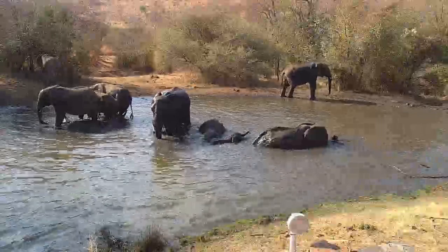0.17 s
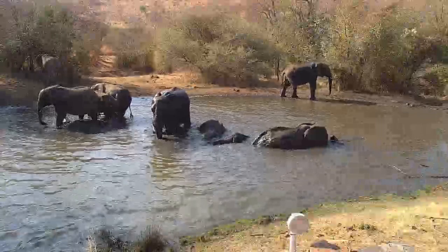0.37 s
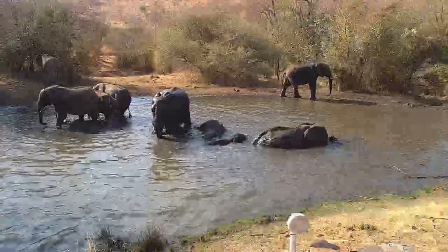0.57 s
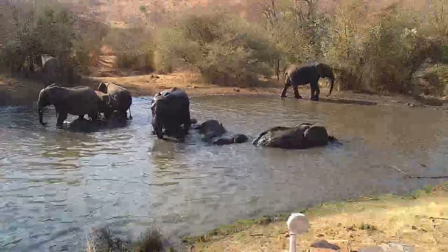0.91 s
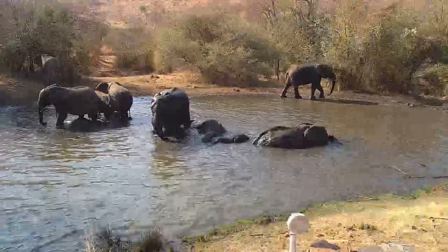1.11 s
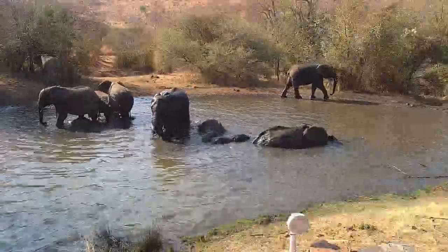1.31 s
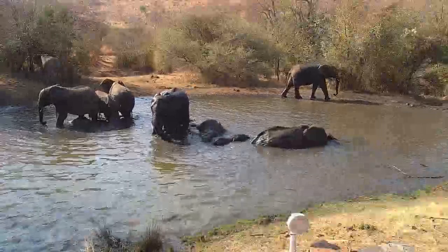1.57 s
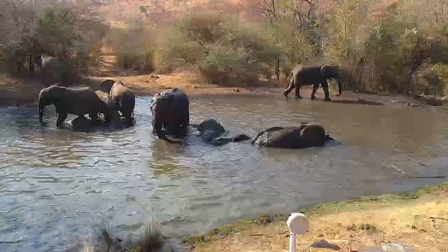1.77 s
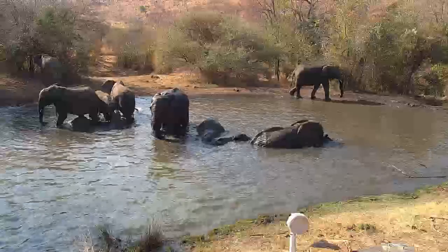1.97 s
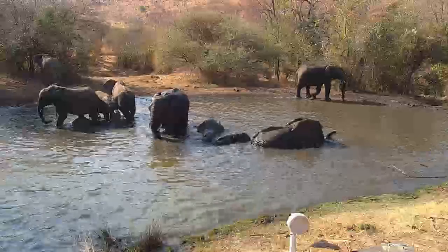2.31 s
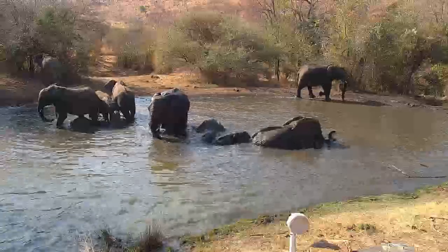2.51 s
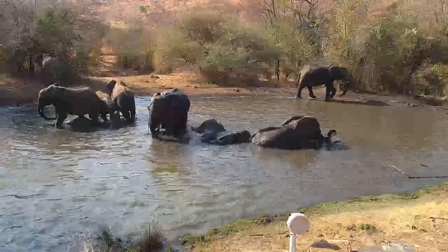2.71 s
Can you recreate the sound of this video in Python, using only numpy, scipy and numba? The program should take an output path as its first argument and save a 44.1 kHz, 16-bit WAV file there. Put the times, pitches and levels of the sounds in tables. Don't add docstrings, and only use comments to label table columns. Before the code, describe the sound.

Elephants wallow in a shallow waterhole: water churns and fizzes, hollow gulps and drops follow, splashes crowd together near one second, then one loud gulping splash; outdoors, heard through a boomy, boxed-in microphone with faint buzz.

```python
import sys
import numpy as np
from scipy import signal
from scipy.fft import rfft, irfft
from scipy.io import wavfile
from scipy.ndimage import uniform_filter1d
from numba import njit

SR = 44100
rng = np.random.default_rng(int(sys.argv[2]) if len(sys.argv) > 2 else 0)


def level_to_linear(level):
    exponent = np.asarray(level, float) / 20
    return 10 ** exponent


def inscribe(sig):
    pcm = np.round(np.clip(np.atleast_2d(sig).T, -1, 1) * 32767)
    wavfile.write(sys.argv[1], SR, pcm.astype(np.int16))


N = 127890

# t/s, effort level/dB, level of the deep slosh/dB
STIRRING = [(0, -44, -13), (.15, -43.5, -5.5), (.3, -42, -2.5), (.5, -38.5, 0), (.64, -41.5, 2.5),
            (.8, -38, -0.5), (1.1, -41, 1.5), (1.42, -40, -0.5), (1.55, -36.5, -6.5), (1.68, -39, -6),
            (1.85, -37, -3), (2.1, -36.5, 0.5), (2.3, -35.5, -5), (2.48, -36, 1.5), (2.58, -40.5, -10.5),
            (2.9, -41.5, 1)]
# t/s, peak level/dB, f/Hz, swell time/s
GULPS = [(.2, -20.5, 383, 0.016), (.372, -23, 385, 0.011), (.432, -16.5, 356, 0.011),
         (.468, -14, 393, 0.013), (0.679, -11.5, 364, 0.026), (.716, -11, 400, 0.0068),
         (0.757, -16.5, 388, 0.014), (.842, -14, 330, 0.0063), (0.884, -14, 312, 0.0018),
         (.998, -17, 345, 0.021), (1.069, -16, 345, 0.01), (1.231, -21.5, 330, 0.0042),
         (1.265, -19.5, 397, 0.0055), (1.31, -20.5, 373, 0.0088), (1.458, 0.2, 383, 0.0069),
         (1.482, -13, 357, 0.0143), (1.792, -11, 408, 0.0055), (1.832, -13.5, 373, 0.017),
         (1.941, -15, 348, 0.025), (1.996, -14, 332, 0.0066), (2.012, -12, 355, 0.0038),
         (2.059, -15, 336, 0.019), (2.13, -10.5, 358, 0.0097), (2.177, -14.5, 380, 0.011),
         (2.248, -11.5, 410, 0.0075), (2.331, -10.5, 329, 0.0064), (2.372, -17.5, 340, 0.018),
         (2.4, -13.5, 360, 0.016), (2.44, -17.5, 337, 0.013), (2.478, -20, 366, 0.011),
         (.005, -31, 385, 0.011), (.125, -30, 368, 0.0076), (0.177, -23, 390, 0.017),
         (.236, -28, 382, .012), (.507, -20, 403, .008), (.537, -20.5, 352, .012), (.568, -21, 380, 0.0086),
         (.935, -25, 385, 0.017), (1.132, -20.5, 404, 0.0067), (1.365, -19, 385, 0.011),
         (1.381, -21, 371, .01), (1.513, -22.5, 380, 0.015), (1.618, -25.5, 369, 0.013),
         (1.565, -23.5, 349, 0.014), (1.594, -19.5, 377, 0.017), (1.707, -23, 386, 0.016),
         (1.73, -25.5, 383, 0.014), (1.773, -19.5, 367, .008), (2.039, -18, 400, 0.0048),
         (2.599, -23, 324, 0.016), (1.89, -18, 342, 0.009)]
# t/s, peak level/dB, f/Hz, swell time/s
THUDS = [(.21, -22, 215, 0.0333), (0.455, -16.5, 296, 0.0188), (.99, -9, 183, 0.0095),
         (0.7, -22, 270, 0.0068), (0.87, -17.5, 300, 0.023), (1.457, -10, 62, 0.0059),
         (1.459, -6, 512, 0.0087), (1.46, -15, 223, 0.0048), (1.3, -14, 330, 0.0096),
         (1.471, -8, 185, 0.0151), (1.7, -11.5, 221, 0.015), (1.918, -11.5, 318, 0.0118),
         (2.63, -20, 299, 0.018), (0.691, -10.5, 554, .015), (2.834, -21, 360, 0.011),
         (0.49, -18, 463, 0.0104), (0.17, -7, 1730, 0.0048), (1.1, -9, 950, 0.018), (1.4, -18, 860, .01),
         (1.179, -9, 3300, 0.013), (1.9, -13.5, 297, .015), (2.44, -16, 294, .012), (2.04, -15.5, 270, .01),
         (2.49, -16, 280, 0.014)]
# t/s, peak level/dB, f/Hz
DROPS = [(0.0991, -40, 2910), (0.415, -27, 3450), (0.4547, -31, 2950), (0.5191, -26, 2930),
         (0.5525, -31, 2920), (0.6219, -32, 2860), (0.9287, -22, 3000), (0.989, -23, 3500),
         (1.029, -21, 2950), (1.1801, -24, 3470), (1.1876, -27, 3460), (1.218, -30, 2900),
         (1.409, -31, 2990), (1.46, -14, 3470), (1.5762, -21, 3480), (1.616, -27, 2940), (1.815, -28, 2930),
         (1.9833, -27, 3540), (2.2043, -28, 3510), (2.2414, -24, 2900), (2.5076, -28, 3450),
         (2.6278, -25, 3470), (2.7312, -26, 2780), (2.854, -27, 2850)]
# t/s, peak level/dB, f/Hz
PLOPS = [(0.205, -23, 2040), (0.466, -32, 780), (0.592, -18, 1920), (0.661, -26, 600), (0.847, -39, 2020),
         (0.963, -31, 830), (0.983, -26, 2010), (1.16, -31, 2060), (1.327, -26, 802), (1.459, -29, 615),
         (1.69, -23, 2050), (1.757, -30, 2030), (1.894, -33, 607), (1.918, -34, 2020), (2.004, -23, 859),
         (2.13, -32, 622), (2.205, -27, 650), (2.543, -30, 1930), (2.832, -35, 2030)]
# t/s, length/s, level/dB, brightness/(dB per octave)
SPLASHES = [(0.126, 0.011, -7, 6), (0.45, 0.038, 3, 1), (0.491, 0.04, 3, -2), (0.745, 0.089, -3.5, -1),
            (0.93, 0.0035, 11, 4.5), (0.931, 0.026, 2.5, 5), (0.984, 0.014, 4, 4), (0.998, 0.019, 9, -0.5),
            (1.027, 0.0077, 8, -0.7), (.949, 0.015, 4.5, 1.5), (1.044, 0.0091, 6, 3), (0.985, 0.042, 0, -5),
            (1.87, 0.051, 2.5, 1), (2.501, .02, -4, 2), (1.181, 0.016, 7.5, -0.5), (1.401, 0.013, -5, 7),
            (1.46, 0.014, 12.5, 2.5), (1.482, 0.033, 6, -1.5), (1.54, 0.091, -13, -4.5),
            (1.81, 0.027, -4, 6.5), (1.839, 0.027, 6, 4.5), (1.985, .01, 2, -1), (2.194, 0.062, -1, -1.5),
            (2.226, 0.028, -2, -2), (2.307, 0.043, -1.5, -4.5), (2.389, 0.076, 4.5, 0), (2.459, 0.03, 4, 0),
            (2.61, 0.037, 7, -1), (2.728, 0.024, 1, 2), (2.847, 0.015, 3, 0)]
# f/Hz, rms level/dB
BUZZ = [(799.2, -56.5), (899.3, -57.5), (1199.1, -55.5)]
# f/Hz, width/Hz, level/dB
CAVITY = [(345, 65, -4), (373, 51.4, -0.5), (474.5, 82, -11), (820, 180, -25), (1334, 88, -22),
          (1901, 93, -18.5), (2013, 93, -16), (2728, 90, -21), (2917, 97, -15), (3480, 91, -16.5),
          (3987, 71, -21.5), (4137, 85, -21), (4490, 55, -26.5), (5085, 146, -27.5)]
# f/Hz, width/Hz, level/dB
WALLS = [(3620, 240, -25), (4860, 92, -33.5), (3120, 256, -24), (6110, 58, -38), (6430, 110, -56),
         (6640, 140, -41), (7100, 250, -43.5), (7740, 110, -40), (8360, 146, -38), (7800, 210, -51),
         (8200, 77, -43.5), (8930, 125, -44), (9800, 98, -46.5), (11000, 160, -54.5), (10950, 130, -55)]
# f/Hz, level/dB
LEAK = [(25, -71), (90, -30.5), (200, -19), (600, -25), (1550, -35.5), (2400, -52), (5500, -42),
        (11000, -58)]


def unit(x):
    return x / np.sqrt(np.mean(x ** 2))


def walk(rate_hz):
    hold = int(SR / rate_hz)
    steps = np.repeat(rng.standard_normal(N // hold + 1), hold)
    smooth = uniform_filter1d(uniform_filter1d(steps, hold), hold)[:N]
    return (smooth - smooth.mean()) / smooth.std()


def band(x, lo_hz, hi_hz):
    edges = [lo_hz, min(hi_hz, 0.45 * SR)]
    return signal.sosfilt(signal.butter(2, edges, "band", fs=SR, output="sos"), x)


@njit
def ring(n, start, hz, cycles, size, glide, sr):
    out = np.zeros(n)
    for g in range(len(start)):
        fade = np.exp(-hz[g] / (cycles * sr))
        climb = 1 + glide * hz[g] / (cycles * sr)
        step = 2 * np.pi * hz[g] / sr
        phase, a, i = 0., size[g], start[g]
        while a > size[g] / 300 and i < n:
            out[i] += a * np.sin(phase)
            phase += step
            step = min(step * climb, 3.)
            a *= fade
            i += 1
    return out


def grains(count, lo_hz, hi_hz, cycles, spread_db, glide):
    when, pitch, rarity = rng.random((count, 3)).T
    start = (when * N).astype(np.int64)
    hz = lo_hz * (hi_hz / lo_hz) ** pitch
    size = level_to_linear(-spread_db * np.log(1 - 0.99 * rarity)) * hz / np.sqrt(hi_hz * lo_hz)
    return unit(ring(N, start, hz, 1. * cycles, size, 1. * glide, 1. * SR))


def churn(effort, heave, shared):
    noise = rng.standard_normal(N)
    trim_db = {240: -2, 120: 2.5}
    out = np.zeros(N)
    for hz in 30 * 2. ** np.arange(9):
        flicker = 0.44 * shared + 1.88 * walk(25.01)
        slosh = heave * np.clip(np.log2(900 / hz), 0, 1)
        tilt = 0.31 * (effort + 41) * np.log2(hz / 900)
        out += level_to_linear(flicker + slosh + tilt + trim_db.get(hz, 0)) * band(noise, hz, 2 * hz)
    return out


def fizz(shared):
    tiny = grains(count=9000, lo_hz=880, hi_hz=12300, cycles=0.9, spread_db=2.5, glide=0.054)
    return tiny * level_to_linear(0.69 * shared + 1.07 * walk(60.03))


def bubbles(heave):
    return level_to_linear(heave) * grains(count=2500, lo_hz=468, hi_hz=1575, cycles=2.28, spread_db=1.1, glide=0.142)


def wallow(t):
    s, effort, heave = np.array(STIRRING).T
    effort = np.interp(t, s, effort)
    heave = np.interp(t, s, heave)
    shared = walk(12)
    water = level_to_linear(30) * churn(effort, heave, shared)
    water += level_to_linear(27.5) * fizz(shared)
    water += level_to_linear(20) * bubbles(heave)
    return level_to_linear(effort) * water


def mains_buzz(t):
    return sum(level_to_linear(db) * np.sqrt(2) * np.sin(2 * np.pi * hz * t) for hz, db in BUZZ)


def gulps(t):
    fade_s, rise, level_db = 0.0019, 0.018, 0.5
    out = np.zeros(N)
    for s, db, hz, swell in [*GULPS, *THUDS]:
        at = slice(int(s * SR), int(s * SR) + SR // 10)
        age = np.clip(t[at] - s, 0, 1)
        swell = max(swell, 0.002)
        attack = np.sin(np.pi / 2 * np.clip(age / swell, 0, 1))
        collapse = np.exp(-np.clip(age - swell, 0, 1) / fade_s)
        cycles = hz * age * (1 - rise + rise * age / swell)
        out[at] += level_to_linear(db + level_db) * attack * collapse * np.sin(2 * np.pi * cycles)
    return out


def drops():
    out = np.zeros(N)
    for table, level_db, cycles in ((DROPS, 16, 6.1), (PLOPS, 15.5, 4.1)):
        s, peak_db, hz = np.array(table, float).T
        start = (s * SR).astype(np.int64)
        out += ring(N, start, 1. * hz, 1. * cycles, level_to_linear(peak_db + level_db), 0.023, 1. * SR)
    return out


def splashes(t):
    attack_s, release_s, level_db = 0.002, 0.0059, -7
    droplets = grains(count=12000, lo_hz=670, hi_hz=13000, cycles=0.98, spread_db=1.5, glide=0.11)
    spatter = unit(rng.standard_normal(N) + 0.68 * droplets)
    octaves = 523 * 2. ** np.arange(5)
    bands = np.array([band(spatter, hz, 2 * hz) for hz in octaves])
    hump_db = -0.59 * np.log2(octaves / 3000) ** 2
    out = np.zeros(N)
    for s, length, db, bright in SPLASHES:
        at = slice(int(s * SR), int(s * SR) + SR // 4)
        age = t[at] - s
        attack = np.clip(age / attack_s, 0, 1)
        release = np.exp(-np.clip(age - length, 0, 9) / release_s)
        colour = level_to_linear(level_db + db + bright * np.log2(octaves / 2400) + hump_db)
        out[at] += attack * release * (colour @ bands[:, at])
    return out


def scene():
    t = np.arange(N) / SR
    hush = level_to_linear(-16) * rng.standard_normal(N)
    return (wallow(t) + gulps(t) + drops() + splashes(t) + hush)[None]


def housing(x, size=16384):
    f = np.maximum(np.arange(size // 2 + 1) * SR / size, 1)
    leak_hz, leak_db = np.array(LEAK).T
    power = level_to_linear(2 * np.interp(np.log(f), np.log(leak_hz), leak_db))
    for hz, width, db in [*CAVITY, *WALLS]:
        power = power + level_to_linear(2 * db) / (1 + (2 * (f - hz) / width) ** 2) ** 1.393
    cepstrum = irfft(np.log(power) / 2, size)
    cepstrum[1:size // 2] *= 2
    cepstrum[size // 2 + 1:] = 0
    impulse = irfft(np.exp(rfft(cepstrum)), size)[None, :size // 2]
    return signal.fftconvolve(x, impulse, axes=1)[:, :N]


def band_limit(x):
    return signal.sosfilt(signal.butter(12, 11140, fs=SR, output="sos"), x)


def record(dry):
    t = np.arange(N) / SR
    mix = housing(dry) + mains_buzz(t)
    mix = signal.sosfilt(signal.butter(1, 30, "high", fs=SR, output="sos"), mix)
    mix = signal.sosfilt(signal.ellip(8, 1, 75, 10950, fs=SR, output="sos"), mix)
    return band_limit(mix)


dry = scene()
out = record(dry)
inscribe(out)
```